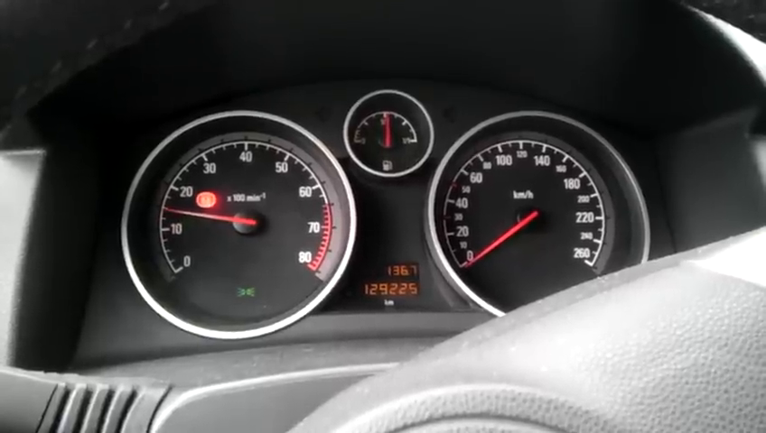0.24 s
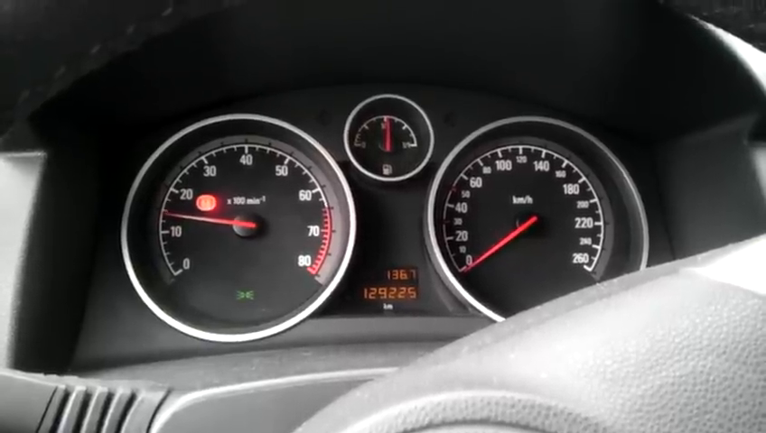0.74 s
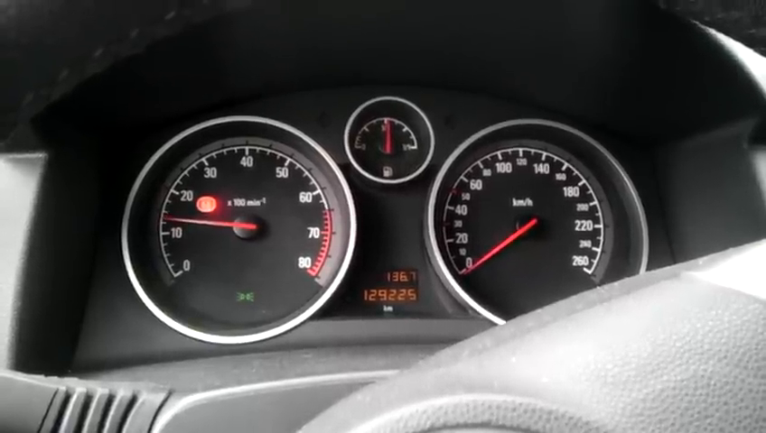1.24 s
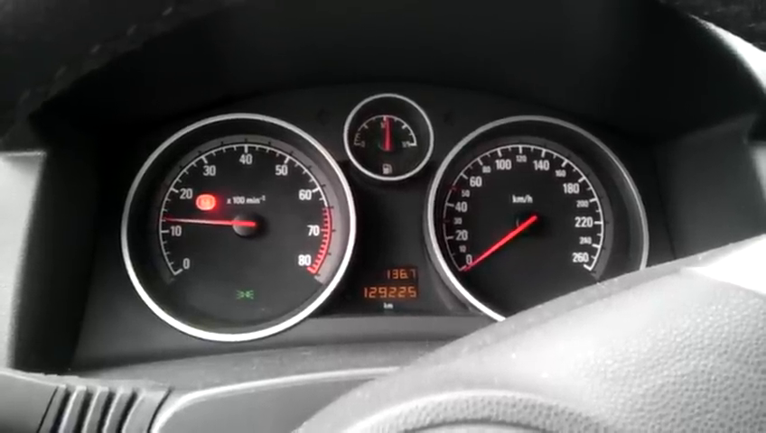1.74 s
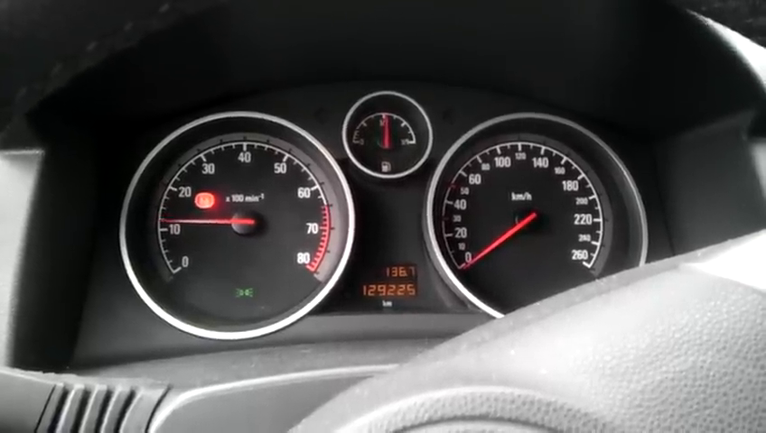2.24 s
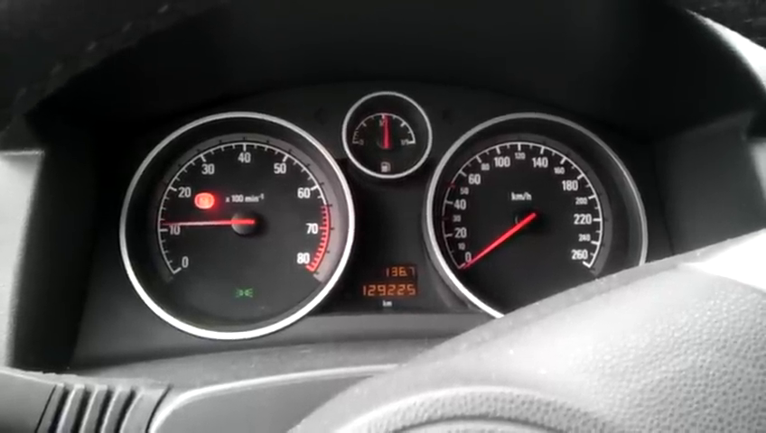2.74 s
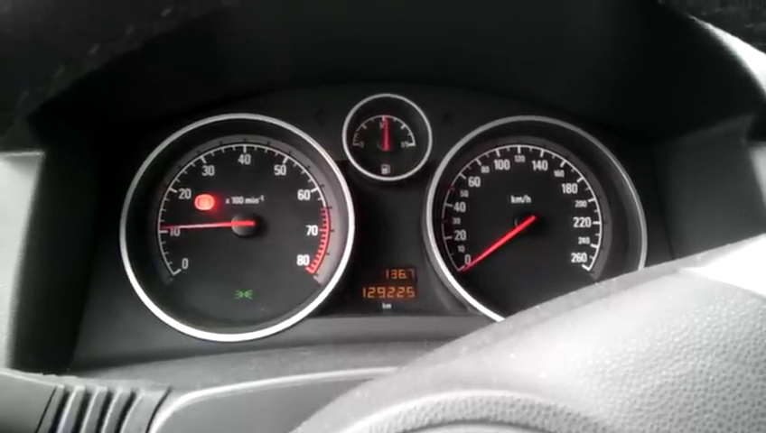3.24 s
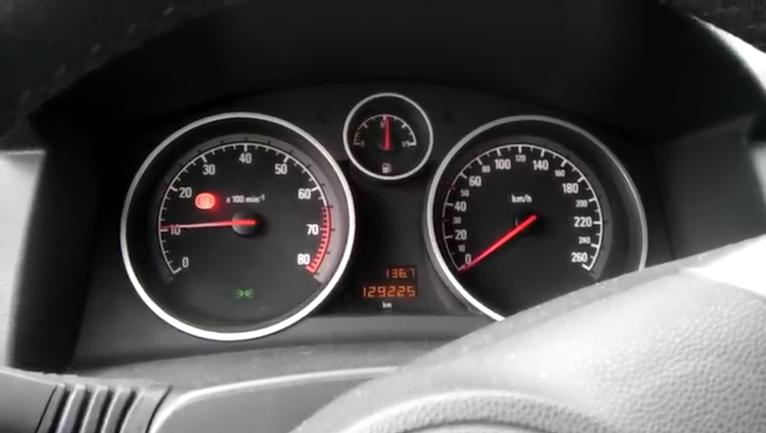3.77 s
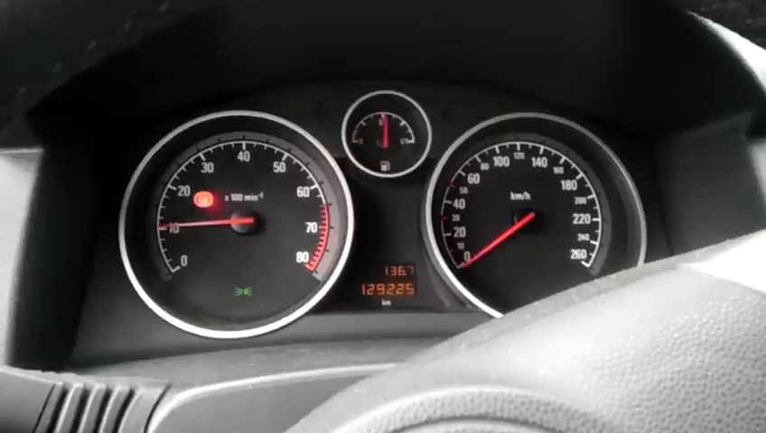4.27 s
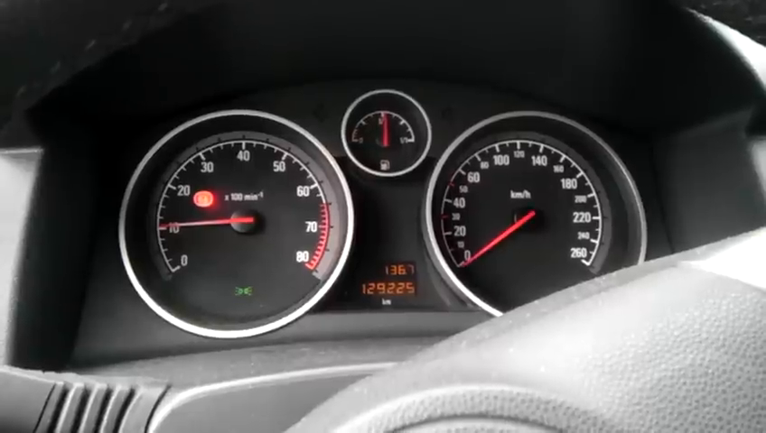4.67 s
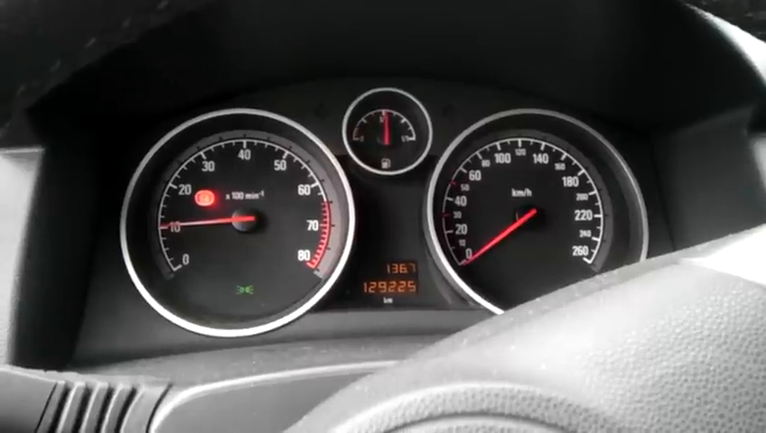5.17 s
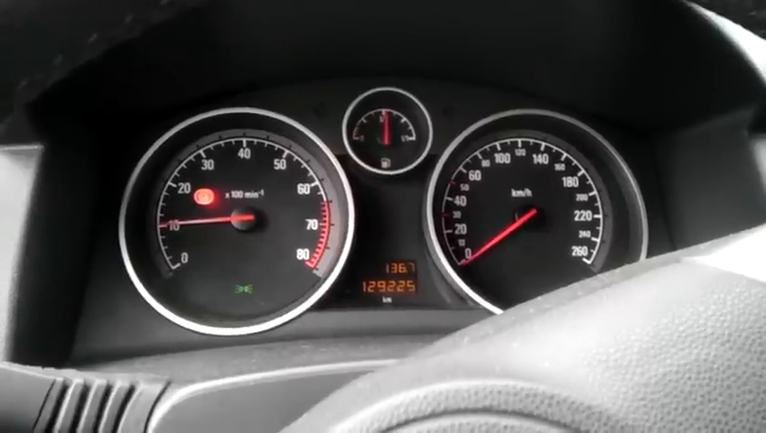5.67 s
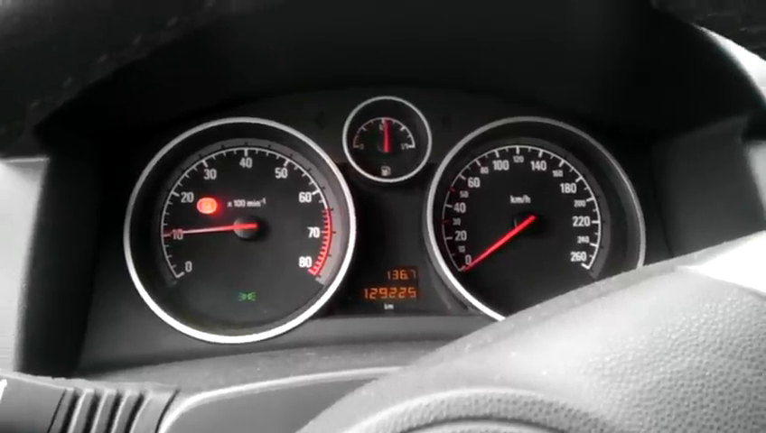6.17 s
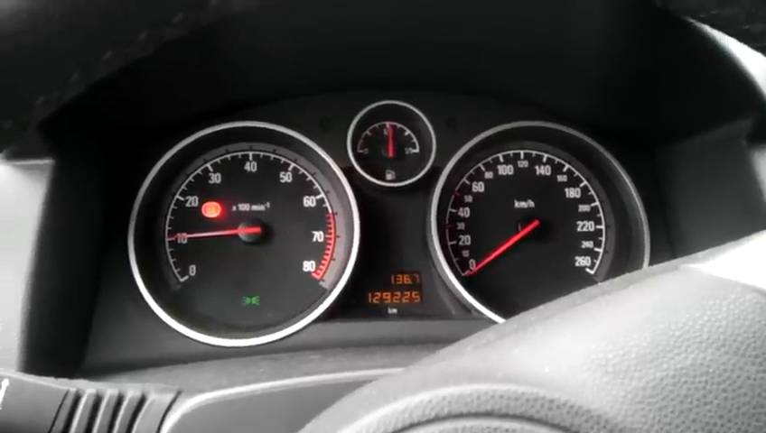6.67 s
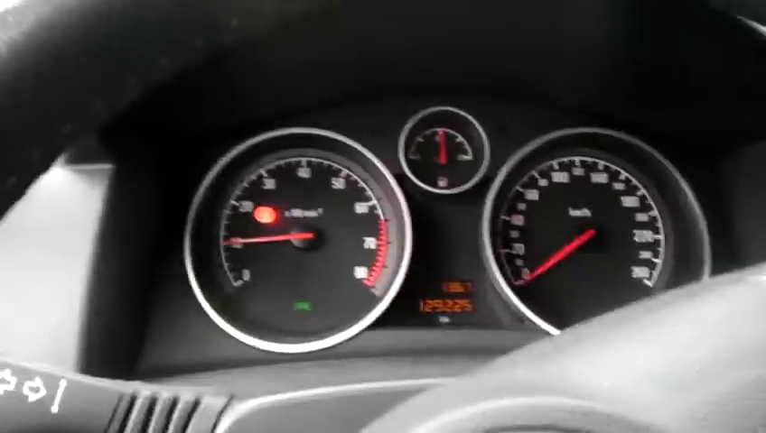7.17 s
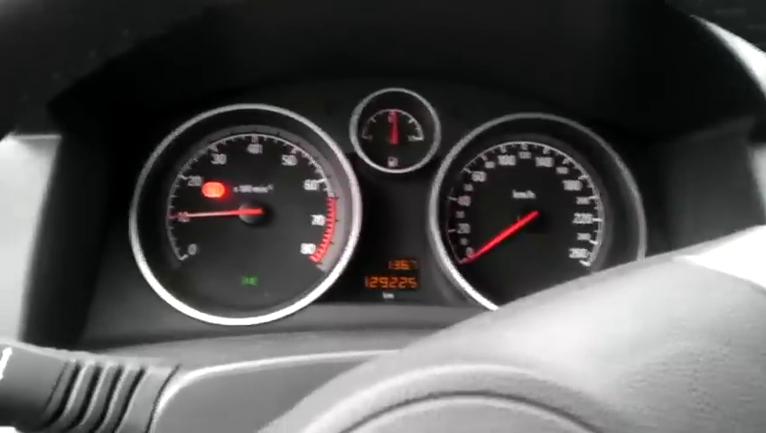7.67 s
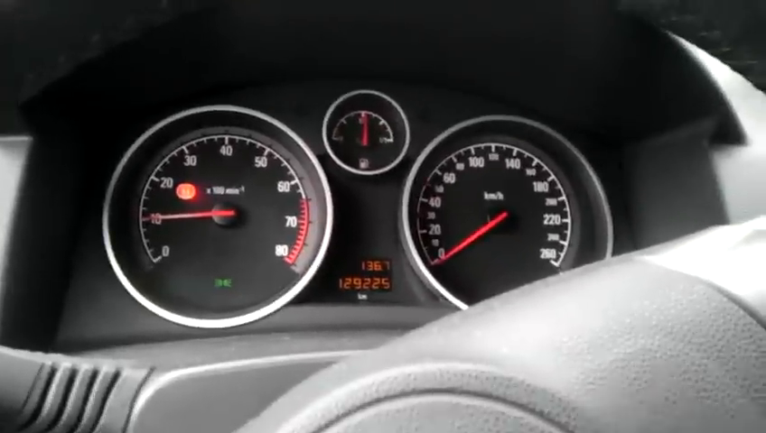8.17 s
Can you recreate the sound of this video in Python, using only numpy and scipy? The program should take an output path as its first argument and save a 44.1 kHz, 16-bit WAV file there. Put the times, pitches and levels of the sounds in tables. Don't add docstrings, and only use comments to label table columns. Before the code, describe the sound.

Inside a parked car, a petrol engine's boomy hum sinks to a steady idle; faint birds chirp outside, then hard knocks hit the microphone.

```python
import sys
import numpy as np
from scipy import signal
from scipy.fft import rfft, irfft
from scipy.io import wavfile
from scipy.ndimage import uniform_filter1d

SR = 44100
rng = np.random.default_rng(int(sys.argv[2]) if len(sys.argv) > 2 else 0)


def magnitude_from_level(level_db):
    exponent = np.asarray(level_db, float) / 20
    return 10 ** exponent


def master_out(mix):
    frames = np.transpose(np.atleast_2d(mix))
    ceiling = np.clip(frames, -1, 1)
    pcm = np.round(ceiling * 32767).astype(np.int16)
    wavfile.write(sys.argv[1], SR, pcm)


N = 371322
T = np.arange(N) / SR


def level(x, db):
    return x * magnitude_from_level(db) / np.sqrt(np.mean(x ** 2))


def along(table, hz):
    f, value = np.transpose(table)
    return np.interp(np.log(hz + 1), np.log(f), value)


def band(x, lo_hz, hi_hz):
    sos = signal.butter(2, [lo_hz, min(hi_hz, .45 * SR)], "band", fs=SR, output="sos")
    return signal.sosfilt(sos, x)


def walk(rate_hz):
    hold = int(SR / rate_hz)
    steps = np.repeat(rng.standard_normal(N // hold + 1), hold)
    return 1.25 * uniform_filter1d(uniform_filter1d(steps, hold), hold)[:N]


def ports(x, pan_db):
    return np.array([x * magnitude_from_level(pan_db / 2), np.roll(x, 16) * magnitude_from_level(-pan_db / 2)])


def controls():
    # t/s, firing rate f/Hz, running level/dB
    engine_course = [(0.0, 48.72, 2.5), (0.3, 49.57, 2.5), (0.72, 46.97, 1.5), (1.011, 45.3, 0.5),
                     (1.201, 44.6, 2), (1.399, 43.5, -3), (1.66, 42.73, -1), (2.319, 39.7, 1),
                     (2.6, 38.14, -0.5), (2.979, 36.47, -5.5), (3.7, 36.09, -7), (4.3, 35.67, -5.5),
                     (4.6, 35.37, -1.5), (5.051, 34.7, -5.5), (5.6, 35, -4), (6.4, 34.67, 0),
                     (7.002, 34.17, 0), (8.42, 35.15, -4)]
    # t/s, level/dB
    ducks = [
        (5.704, -6),
        (7.125, -7.5),
    ]
    release_s = 0.5
    s, hz, running_db = np.transpose(engine_course)
    duck_db = sum(db * (T > at) * np.exp(-np.maximum(T - at, 0) / release_s) for at, db in ducks)
    duck = magnitude_from_level(uniform_filter1d(duck_db, size=400))
    return np.interp(T, s, hz), np.interp(T, s, running_db), duck


def cabin_noise(spectrum, flicker_db, throb):
    # f/Hz, share [0-1]
    alike = [(60, 1), (300, 1), (700, 0.4), (1500, 0.7), (4000, 0.2), (7000, 0), (13000, 0)]
    hz = np.fft.rfftfreq(N, 1 / SR)
    share = np.clip(along(alike, hz), 0, 1)
    white = rng.standard_normal((3, N))
    common = rfft(ports(white[0], 0)) * np.sqrt(share)
    both = (common + rfft(white[1:]) * np.sqrt(1 - share)) * magnitude_from_level(along(spectrum, hz))
    out = 0
    for centre in 2. ** np.arange(np.log2(spectrum[0][0]), np.log2(spectrum[-1][0]) + 1):
        octave = np.clip(1 - abs(np.log2((hz + 1) / centre)), 0, 1)
        flicker = magnitude_from_level(flicker_db * (1 + centre / 9000) * walk(15))
        out = out + irfft(both * octave, N) * flicker
    return level(out * throb, 0)


def firing_boom(hz, firings):
    # multiple of the firing rate [1], level/dB
    orders = [(1, -9), (1.5, -20), (2, -3.5), (2.5, -26.5), (3, 3), (3.5, -13), (4, -3), (4.5, -16),
              (5, 2.5), (5.5, -13), (6, 0), (6.5, -17.5), (7, -5), (7.5, -9.5), (8, -4), (8.5, -16.5),
              (9, -9.5), (9.5, -19), (10, -12), (11, -7.5)]
    # f/Hz, width/Hz, level/dB
    resonances = [(49, 10, 1), (90, 9.2, -4), (121, 16, 0), (138, 26, 1), (159.4, 30, 2), (192.8, 20, 2),
                  (215.7, 29, -0.5), (241.1, 27, 1), (277, 7.3, -3.5), (305, 14, -2.5), (322.4, 12, -4.5),
                  (357.6, 30, 0), (395, 34, -5.5)]
    grid = np.arange(20., 600.)
    power = sum((magnitude_from_level(db) / (1 + (2 * (grid - f) / width) ** 2)) ** 3.0 for f, width, db in resonances)
    cabin = np.sqrt(power)
    boom = 0
    for k, db in orders:
        gain = magnitude_from_level(db + 1.2 * walk(3)) * np.interp(k * hz, grid, cabin)
        boom = boom + gain * np.sin(2 * np.pi * (k * firings + rng.random()))
    return boom


def engine():
    # f/Hz, density level/dB
    rumble_spectrum = [(18, -75), (30, -27.5), (75, -12.5), (119, -3), (194, -3.5), (228, -6), (285, -9),
                       (320, -7.5), (480, -33.5), (620, -39.5), (1060, -120)]
    # f/Hz, density level/dB
    roar_spectrum = [(250, -37), (420, -7.5), (583, -11.5), (661, -12.5), (716, -8), (780, -17),
                     (837, -12.5), (1400, -17.5), (1820, -22), (3080, -120)]
    # f/Hz, density level/dB
    hiss_spectrum = [(760, -43.5), (1300, -10.5), (1490, -4), (1800, -3.5), (1940, 0), (2560, -0.5),
                     (2820, -2.5), (3030, -4), (3280, -3.5), (4460, -7), (6510, -23), (10800, -12.5),
                     (13200, -14), (14000, -29)]
    hz, running_db, duck = controls()
    firings = np.cumsum(hz * (1 + .002 * walk(10))) / SR
    strength_db = rng.standard_normal(N // 500)[firings.astype(int)]
    uneven = uniform_filter1d(magnitude_from_level(1.2 * strength_db), size=300)
    throb = 1 + 0.11 * np.cos(2 * np.pi * firings)
    boom = magnitude_from_level(-46.5 + 0.33 * running_db) * ports(firing_boom(hz, firings) * uneven, -2.0)
    rumble = magnitude_from_level(-50.5 + 0.27 * running_db) * cabin_noise(rumble_spectrum, flicker_db=1.5, throb=throb * uneven)
    roar = magnitude_from_level(-56 + 0.58 * running_db) * cabin_noise(roar_spectrum, flicker_db=0.45, throb=throb)
    hiss = magnitude_from_level(-61 + running_db) * cabin_noise(hiss_spectrum, flicker_db=0.7, throb=throb)
    hiss = hiss * magnitude_from_level(np.array([[-.6], [.6]]))
    return duck * (boom + rumble + roar + hiss)


def knocks():
    # t/s, peak level/dB, left minus right/dB, first f/Hz, last f/Hz
    blows = [(5.622, -44, 3.5, 2910, 880), (5.663, -40.5, 7.5, 3890, 2040), (5.6932, -3, 17, 1700, 900),
             (5.697, 11, 2, 1398, 560), (5.701, 2.5, 7, 798, 515.6), (5.73, -34.5, -1, 4100, 1520),
             (6.192, -30.5, 14, 1196, 507), (6.478, -35, -5, 1180, 508), (6.53, -28.5, 26, 1120, 556),
             (6.6951, 0, -11, 600, 440), (6.7002, -9, -5, 560, 400), (6.939, -31, 14, 1830, 1300),
             (6.996, -22, -10, 351, 230), (7.024, -34, -14, 3500, 2800), (7.031, -36, -17, 3000, 2000),
             (7.04, -3.5, -9, 1050, 240), (7.053, -1, -15, 2140, 256.6), (7.102, -9, -12, 495, 286),
             (7.113, 4, -7.5, 1150, 300), (7.118, -3, -3, 699, 327.5), (8.032, -36, -32, 1160, 592),
             (8.194, -44, 12, 1520, 800), (8.208, -40, -3, 1450, 770)]
    out, t = np.zeros((2, N)), T[:SR // 12]
    chances = rng.standard_normal((len(blows), 2, len(t)))
    for (s, db, pan_db, first_hz, last_hz), chance in zip(blows, chances):
        decay_s = 0.00069 + 1.54 / last_hz
        hz = last_hz / (1 + t / 0.011) + (first_hz - last_hz) * np.exp(-t / .0016)
        turns = np.cumsum(hz) / SR * np.array([[1.12], [1]])
        ring = (t / decay_s) ** 0.66 * np.exp(.6 - (t / decay_s) ** 2)
        chirp = min(1, 600 / last_hz) * ring * np.sin(2 * np.pi * turns)

        crack_db = -13 + 6 * np.log2(first_hz / 1000)
        burst = chance * np.exp(-(t / 0.0041) ** 2)
        crack = magnitude_from_level(crack_db) * band(burst, first_hz * .6, first_hz * 2.14)
        crack = band(crack, 330, 4100)

        swell = (t / .005) ** 2 * np.exp(2 - 2 * t / .005)
        sway = swell * np.sin(2 * np.pi * 240 * t / (1 + t / .025))
        thump = magnitude_from_level(-15) * 400 / last_hz * band(sway, 69, 500)
        low_push_s = 0.0077
        low_push = magnitude_from_level(-16) * band(t / low_push_s * np.exp(1 - t / low_push_s), 45, 220)

        i = int(s * SR)
        side_db = np.array([[pan_db], [0]]) - max(pan_db, 0)
        out[:, i:i + len(t)] += magnitude_from_level(db + side_db) * (chirp + crack)
        out[:, i:i + len(t)] += magnitude_from_level(db + .4 * side_db - 2.0) * (thump + 400 / last_hz * low_push)
    return out


def rubs():
    # t/s, length/s, rms level/dB, centre f/Hz, treble level/dB
    slides = [(5.611, 0.1, -52.5, 894, -3.5), (5.646, 0.033, -55, 1200, -5.5), (5.687, .012, -36, 1494, 10),
              (5.728, 0.025, -53, 600, -2.5), (6.193, 0.066, -38.5, 620, -3),
              (6.524, 0.074, -47.5, 556, -16), (6.701, 0.052, -35, 530, -16),
              (6.749, 0.052, -48.5, 500, -14.5), (6.938, 0.012, -39, 1600, -18),
              (6.952, 0.07, -53, 710, -6.5), (6.989, 0.054, -46.5, 810, -2.5),
              (7.042, 0.1, -37.5, 505, -14), (7.089, 0.028, -28.5, 436, -19.5),
              (7.137, 0.06, -51.5, 1040, -5), (7.249, 0.031, -44.5, 1350, -13),
              (7.743, 0.042, -61, 710, -22), (8.028, 0.03, -50.5, 690, -18)]
    out = np.zeros((2, N))
    for s, length, db, hz, treble_db in slides:
        pan_db = -8.5 if s > 6.4 else 6.5
        t = T[:int(length * SR)]
        chance = rng.standard_normal((4, SR // 8))[:, :len(t)]
        slips = (chance[:2] + .5 * chance[2]) * magnitude_from_level(4.5 * abs(chance[3]))
        body = level(band(band(slips, hz / 2.2, hz * 1.4), hz / 3, hz * 1.7), 0)
        grit = band(band(slips[:, ::-1], 800, 3600), 500, 5600)
        scratch = level(grit, treble_db) + level(band(slips, 5400, 11000), treble_db - 18.5)
        fade = np.clip(np.minimum(t / 0.0074, (length - t) / 0.0047), 0, 1)
        shape = fade * magnitude_from_level(3.4 * walk(47)[:len(t)])
        i = int(s * SR)
        side = magnitude_from_level(db + np.array([[pan_db], [-pan_db]]) / 2)
        out[:, i:i + len(t)] += side * shape * (body + scratch)
    return out


def ticks():
    # t/s, peak level/dB
    nail = [
        (5.698, -18.5),
        (6.103, -59),
        (6.838, -56.5),
        (6.94, -58),
        (7.003, -56),
        (7.025, -37.5),
        (7.034, -40),
        (7.054, -39),
        (7.114, -26),
    ]
    out, t = np.zeros((2, N)), T[:SR // 100]
    for (s, db), chance in zip(nail, rng.standard_normal((len(nail), 3, len(t)))):
        burst = (chance[:2] + chance[2]) * np.exp(-t / 0.0014)
        out[:, int(s * SR):][:, :len(t)] += magnitude_from_level(db) * band(burst, 6500, 13000)
    return out


def pump():
    _, running_db, duck = controls()
    phase = 2 * np.pi * np.cumsum(720 * (1 + 0.0022 * walk(3.1))) / SR
    strength = magnitude_from_level(-63 + 0.51 * running_db + 4 + 2.0 * walk(2.6))
    return ports(duck * strength * np.sin(phase), -1.0)


def whistles():
    # t/s, length/s, first f/Hz, last f/Hz, level/dB
    notes_sung = [(0.03, 0.037, 3410, 3140, -61), (0.084, 0.035, 3450, 3700, -63),
                  (0.478, .03, 2500, 2800, -64), (0.499, .045, 2860, 2750, -61),
                  (0.673, 0.058, 3350, 3170, -57), (0.864, .02, 3760, 3300, -54),
                  (0.871, .11, 3320, 2940, -53.5), (1.045, .05, 2560, 2680, -62),
                  (1.273, 0.024, 3480, 3250, -55.5), (1.3, 0.064, 3540, 3690, -57.5),
                  (1.638, 0.081, 2770, 3200, -58.5), (1.86, 0.091, 3370, 3314, -57.5),
                  (2.0, 0.048, 2950, 2790, -62), (2.047, 0.045, 2790, 3280, -58),
                  (2.085, .035, 2950, 2750, -62), (4.216, .03, 3510, 3860, -63),
                  (4.24, .07, 3880, 4050, -66), (4.29, .07, 3980, 4620, -61),
                  (4.345, 0.035, 4600, 4900, -59)]
    out = np.zeros(N)
    for s, length, first_hz, last_hz, db in notes_sung:
        part = np.linspace(0, 1, int(length * SR))
        glide = np.sin(2 * np.pi * np.cumsum(first_hz + (last_hz - first_hz) * part) / SR)
        out[int(s * SR):][:len(part)] += magnitude_from_level(db - 0.5) * np.sin(np.pi * part) ** 0.36 * glide
    return out


def wheeze():
    # t/s, level/dB, highest f/Hz
    trill = [
        (4.38, -71, 4720),
        (4.421, -71.5, 4960),
        (4.55, -64, 5460),
        (4.703, -64.5, 5930),
        (4.851, -66, 6310),
        (4.95, -71, 6170),
        (5.051, -78, 5640),
    ]
    low_hz, rate_hz = 3650, 181
    s, *columns = np.transpose(trill)
    db, high_hz = (np.interp(T, s, c) for c in columns)
    swing = np.cumsum(rate_hz * (1 + 0.029 * walk(68))) / SR
    height = abs(2 * (swing % 1) - 1)
    hz = low_hz + (high_hz - low_hz) * height + 80 * walk(180)
    tilt = magnitude_from_level(-6.5 * (hz - 4500) / 1000)
    pulse = np.sin(np.pi * height) ** 0.34 * tilt * (T > s[0]) * (T < s[-1])
    call = magnitude_from_level(db + 9.5 + 1.1 * walk(150)) * pulse * np.sin(2 * np.pi * np.cumsum(hz) / SR)
    return call - 0.28 * np.roll(call, 49)


def birds():
    song = whistles() + wheeze()
    echo = rng.standard_normal((2, SR // 8)) * np.exp(-T[:SR // 8] / .022)
    wet = signal.fftconvolve(song[None], echo / np.sqrt(np.sum(echo[0] ** 2)))[:, :N]
    return ports(song, -3.0) + magnitude_from_level(-4) * wet


def treble_dropouts(x):
    # low f/Hz, high f/Hz, share of time [0-1]
    gaps = [(5400, 6200, .12), (6200, 6900, .4), (6900, 7600, .3), (7600, 9000, .1), (9000, 10500, .04),
            (12500, 13200, .5), (13200, 14300, .85)]
    frame = 1536
    hz = np.fft.rfftfreq(N, 1 / SR)
    need = rng.random(N // frame + 1)
    for low_hz, high_hz, share in gaps:
        chance = .7 * need + .3 * rng.random(len(need))
        off = np.repeat(chance < .12 + .76 * share, frame)[:N]
        part = irfft(rfft(x) * ((hz > low_hz) & (hz < high_hz)), N)
        faint = uniform_filter1d(np.mean(part ** 2, axis=0), size=frame) < magnitude_from_level(-77) ** 2
        x = x - part * uniform_filter1d(1. * (off & faint), size=frame // 4)
    return x


def scene():
    return engine() + knocks() + rubs() + ticks() + pump() + birds()


def low_pass(x):
    return signal.sosfilt(signal.butter(12, 15330, fs=SR, output="sos"), x)


def record(dry):
    bass_cut = signal.butter(2, 45, "high", fs=SR, output="sos")
    top_cut = signal.ellip(6, .3, 40, 13900, fs=SR, output="sos")
    heard = signal.sosfilt(top_cut, signal.sosfilt(bass_cut, dry))
    mix = treble_dropouts(np.clip(heard, -1, 1))
    return low_pass(mix)


dry = scene()
out = record(dry)
master_out(out)
```